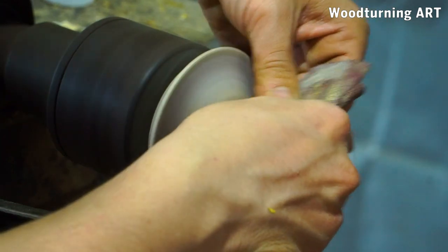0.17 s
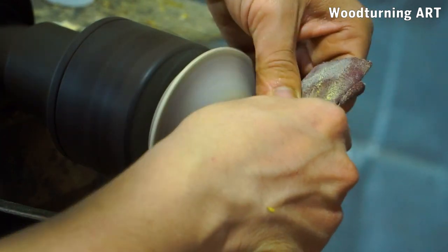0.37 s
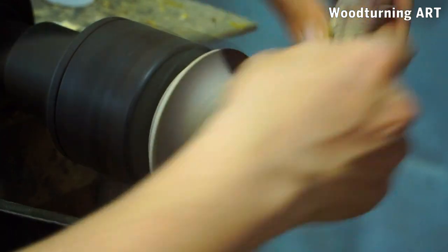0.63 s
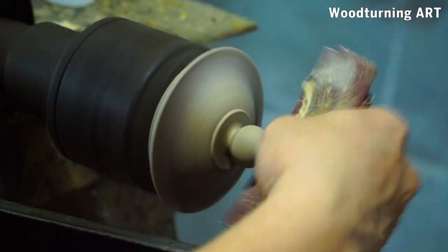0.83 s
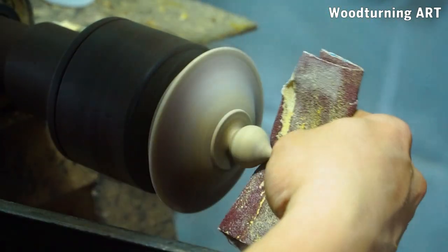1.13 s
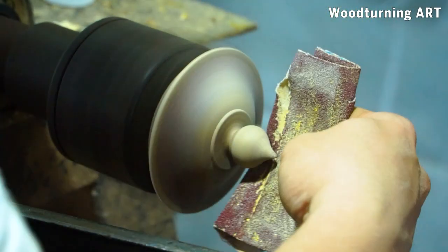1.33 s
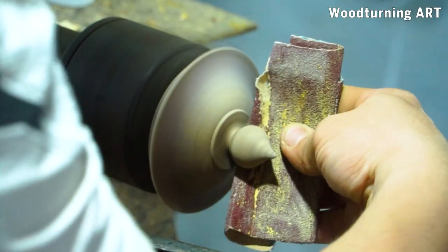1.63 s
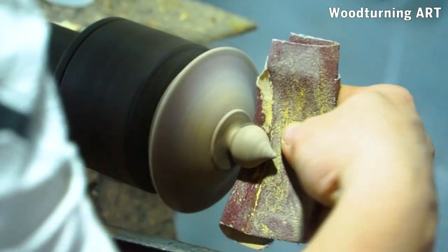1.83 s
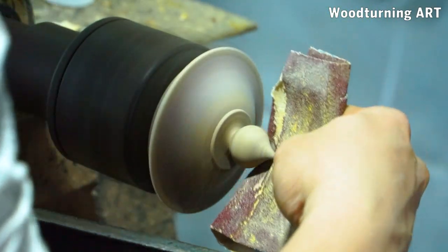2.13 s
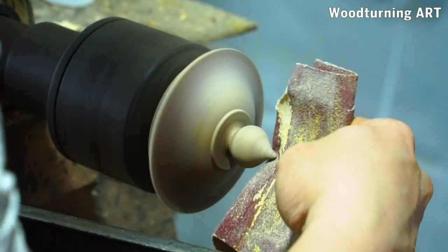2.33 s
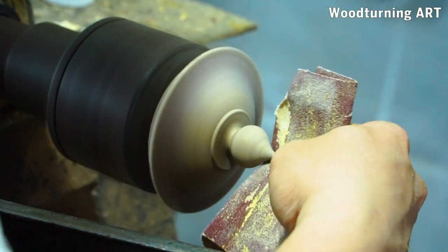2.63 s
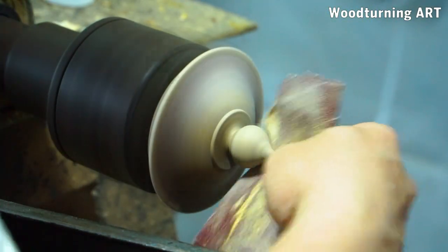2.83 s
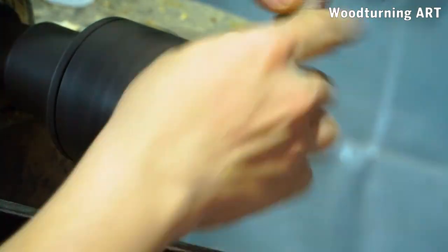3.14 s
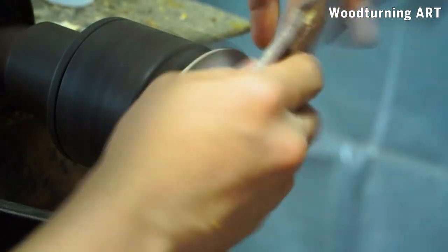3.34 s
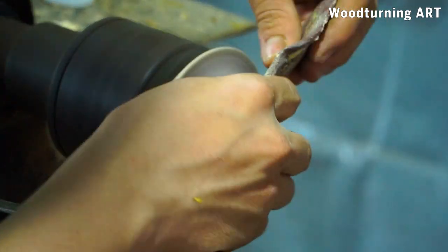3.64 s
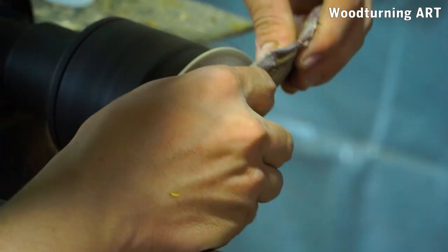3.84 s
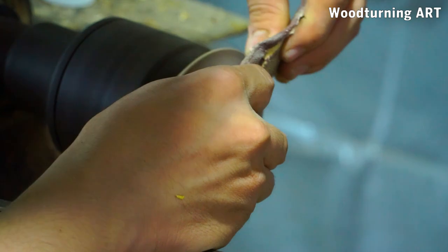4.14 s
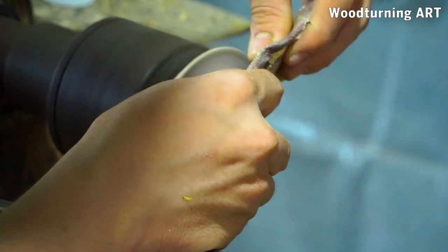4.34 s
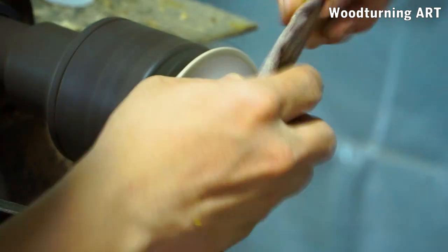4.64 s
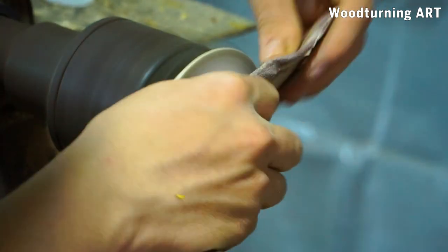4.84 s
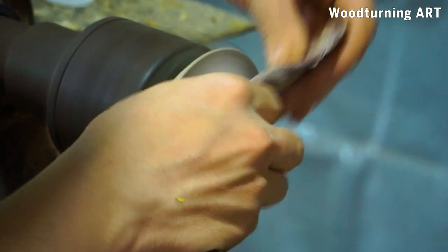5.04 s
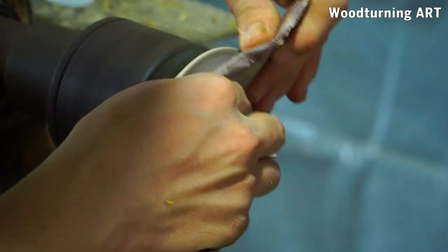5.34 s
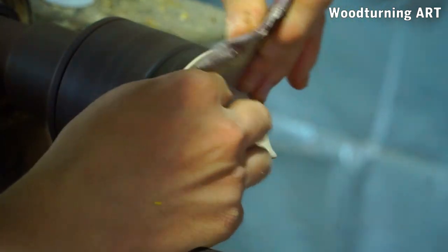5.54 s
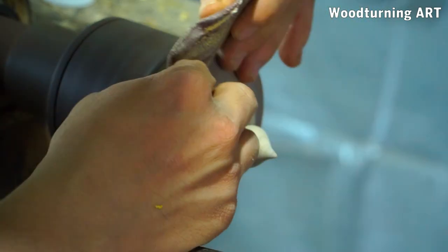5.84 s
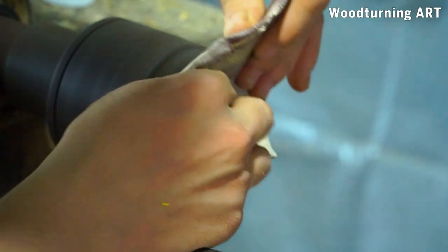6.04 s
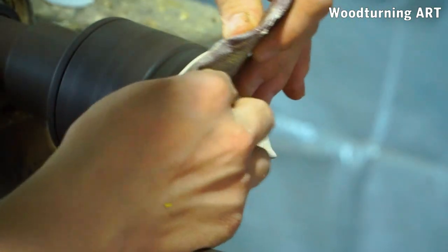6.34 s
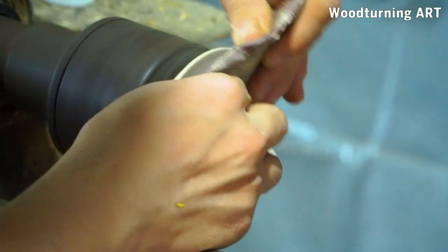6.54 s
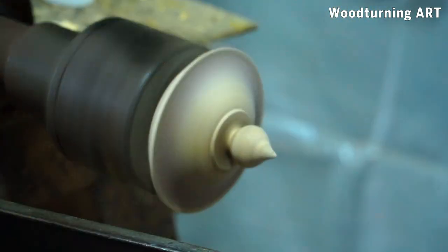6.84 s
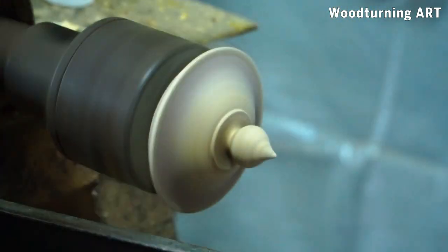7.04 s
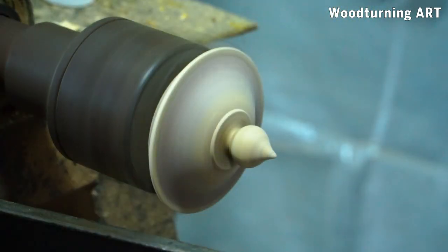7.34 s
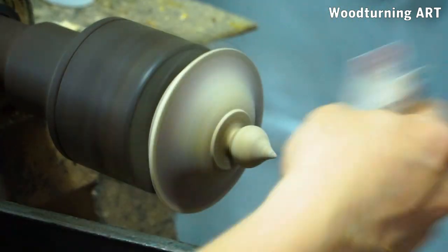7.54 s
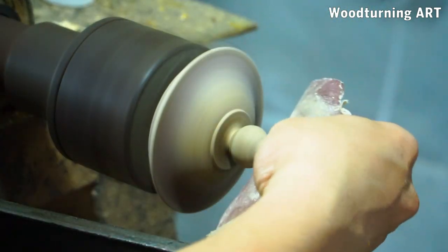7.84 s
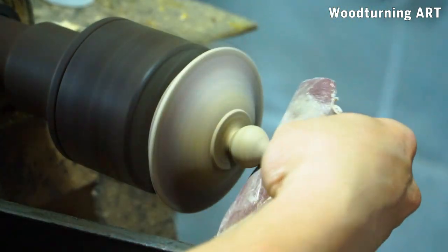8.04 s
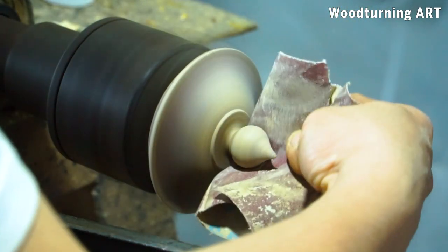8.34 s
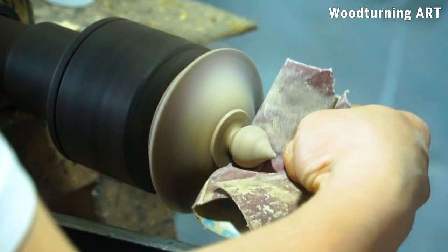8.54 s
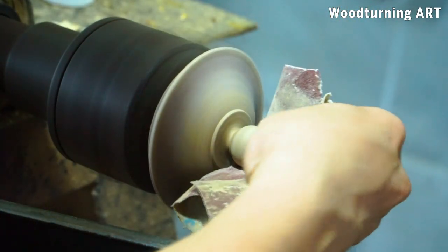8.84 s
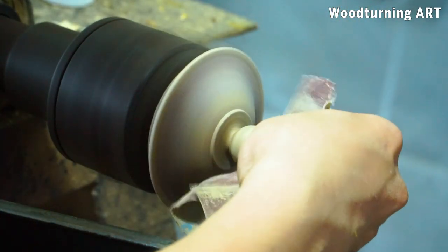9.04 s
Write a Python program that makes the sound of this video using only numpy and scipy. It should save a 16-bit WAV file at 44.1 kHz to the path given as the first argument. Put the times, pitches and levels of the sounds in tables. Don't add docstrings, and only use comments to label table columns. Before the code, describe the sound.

A wood lathe hums and whines steadily while hand-held sandpaper hisses, rasps and fizzes in uneven strokes against the spinning wood, close up.

```python
import sys
import numpy as np
from scipy import signal
from scipy.fft import rfft, irfft, next_fast_len
from scipy.io import wavfile
from scipy.ndimage import uniform_filter1d

SR = 44100
rng = np.random.default_rng(int(sys.argv[2]) if len(sys.argv) > 2 else 0)


def amplitude_ratio(level_db):
    exponent = np.asarray(level_db, float) / 20
    return 10 ** exponent


def wrap_up_sound(samples):
    columns = np.atleast_2d(samples).T
    tamed = np.clip(columns, -1, 1)
    steps = np.round(tamed * 32767).astype(np.int16)
    wavfile.write(sys.argv[1], SR, steps)


N = 404838


def evened(x):
    return x / np.sqrt(np.mean(x ** 2) + 1e-20)


def read(points, hz):
    f, value = np.transpose(points)
    return np.interp(np.log(hz + 1), np.log(f + 1), value)


def curve(points):
    s, db = np.transpose(points)
    return np.interp(np.arange(N) / SR, s, db)


def drift(hz):
    steps = rng.standard_normal(4000)
    return evened(np.interp(np.arange(N) / SR * 2 * hz, np.arange(4000), steps))


def peaks(modes, hz):
    return np.sqrt(sum((amplitude_ratio(db) / (1 + (2 * (hz - f) / width) ** 2)) ** 2 for f, width, db in modes))


def coloured(x, gain):
    size = next_fast_len(N, True)
    spectrum = rfft(x, size) * gain(np.fft.rfftfreq(size, 1 / SR))
    return evened(irfft(spectrum, size)[:, :N])


def noise(gain, patchy_db):
    frames = N // 256 + 5
    patches = uniform_filter1d(rng.standard_normal((257, frames)), size=8, axis=0)
    patches = evened(uniform_filter1d(patches, size=10, axis=1))
    z = np.exp(2j * np.pi * rng.random((2, 257, frames))) * rng.rayleigh(size=(2, 257, frames))
    hiss = signal.istft(z * amplitude_ratio(patchy_db * patches), window="cosine", nperseg=512, noverlap=256)[1]
    return coloured(hiss, gain)


def snags(per_s, spread_db, t60, share):
    draws = rng.random((2, N))
    sizes = (draws[0] < per_s / SR) * amplitude_ratio(-spread_db * np.log(draws[1] + 0.00042))
    tail = signal.lfilter([1], [1, -amplitude_ratio(-60 / (t60 * SR))], sizes)
    return evened(1 + share * evened(tail))


def strokes(rows, rest_db):
    rise_s, fall_s = 0.082, 0.063
    power = amplitude_ratio(rest_db) ** 2
    for start, length, db in rows:
        at = slice(max(round(start * SR), 0), round((start + length) * SR))
        t = np.arange(N)[at] / SR - start
        shape = np.clip(np.minimum(t / rise_s, (length - t) / fall_s), 0, 1)
        power[at] += (amplitude_ratio(db) * shape) ** 2
    return 10 * np.log10(power)


# (time [s], level [dB])
BED_RING = [
    (0, -50),
    (.05, -33),
    (.15, -29),
    (.22, -36),
    (.5, -39),
    (.65, -70),
]


def bed_ring():
    shake = rng.standard_normal((2, N))
    return amplitude_ratio(curve(BED_RING)) * coloured(shake, lambda hz: peaks([(720, 28, 0)], hz))


# (time [s], level [dB])
DRONE_REST = [(0.0, -50), (1.2, -48), (3.6, -56.5), (6.5, -70), (8.3, -59), (9.18, -61)]
# (start [s], length [s], level [dB])
DRONE_BOUTS = [(-.1, 0.27, -51), (.24, 0.19, -47), (.6, 0.37, -44), (.9, 0.37, -42), (1.2, .42, -44.5),
               (2.02, .26, -47), (2.5, 0.17, -50), (2.8, 0.21, -45), (3.17, 0.37, -49), (3.56, 0.22, -48),
               (4.15, 0.2, -48), (4.42, .16, -55), (4.85, 0.41, -53), (7.5, .5, -60), (8.4, .35, -54),
               (8.88, 0.13, -50)]


def drone_level():
    return strokes(DRONE_BOUTS, curve(DRONE_REST))


# (frequency [Hz], width [Hz], level [dB])
DRONE_BANDS = [(60, 130, -12), (164, 24, -12), (207.8, 8.2, -0.5), (248.8, 12.5, 1), (292.7, 5.4, 6),
               (337, 18, 2)]


def drone_noise(level_db):
    shake = rng.standard_normal((2, N))
    return amplitude_ratio(level_db - 4.0) * coloured(shake, lambda hz: peaks(DRONE_BANDS, hz))


def drone_tones(level_db):
    drone_hz, flutter_db, flutter_hz = 41.8, 2, 5.1
    turns = np.cumsum(drone_hz * (1 + 0.00802 * drift(3.5))) / SR
    out = np.zeros(N)
    for k, db in ((5, -3.5), (6, -1.8), (7, -4), (8, -5)):  # multiple, dB
        level = amplitude_ratio(level_db + db + flutter_db * drift(flutter_hz))
        out += level * np.cos(2 * np.pi * (k * turns + rng.random()))
    return out


# (frequency [Hz], level [dB per Hz])
ROAR = [(30, -58), (110, -39), (200, -31), (350, -18.5), (750, -9), (1000, -5.5), (1300, -1), (1700, -3),
        (3000, -6), (4100, -5), (4600, -12), (8200, -21.5), (9200, -37.5), (15700, -18.5)]


def roar():
    return noise(lambda hz: amplitude_ratio(read(ROAR, hz)), patchy_db=0.84) * snags(60., 1.6, 0.043, 0.13)


def tones(rows, starts):
    belt_hz, throb, waver = 6.8, .12, .08
    t = np.arange(N) / SR
    t = t + np.cumsum(0.00031 * drift(1.481)) / SR
    throbs = [1 + throb * np.cos(2 * np.pi * (belt_hz * t + rng.random())) + waver * drift(10.5)
              for _ in range(4)]
    out = np.zeros(N)
    for k, (hz, db) in enumerate(rows):
        out += amplitude_ratio(db + 3) * throbs[k % 4] * np.cos(2 * np.pi * (hz * t + starts[k]))
    return out


HUM = {4: -62.5, 12: -40.5, 16: -38, 17: -51.5, 20: -44, 28: -39}
# (frequency [Hz], level [dB])
STRAYS = [(768.6, -49), (1171.4, -39), (1338.9, -36), (1509.6, -43), (1649.2, -38.5), (1924.4, -51),
          (2052.3, -63), (2253.8, -37), (2685, -37.5)]
WHINE = {-4: -33, -2: -41, -1: -37, 0: -22.5, 1: -38, 3: -37.5, 4: -24.5, 5: -44, 8: -39.5, 9: -42, 12:
         -36.5, 20: -40}
TEETH = {2: -49.5, 5: -76, 9: -45, 10: -46, 11: -45, 12: -48, 13: -32.5}
# (time [s], level [dB])
LOAD = [(0.0, -35.5), (0.6, -41), (1.05, -40), (2.9, -38.5), (3.35, -40), (3.8, -37.5), (4.5, -36.5),
        (5.3, -38.5), (6.1, -38), (6.8, -39), (8.16, -39.5), (9.18, -39.5)]


def motor_tones():
    shaft_hz, slot_hz, tooth_hz = 37.6, 1269.4, 201.5
    hum = [(k * shaft_hz, db) for k, db in HUM.items()] + STRAYS
    whine = [(slot_hz + k * shaft_hz, db) for k, db in WHINE.items()]
    teeth = [(k * tooth_hz, db) for k, db in TEETH.items()]
    whine_starts = [-k ** 2 / 128 + k % 2 / 4 for k in WHINE]
    load_db = curve(LOAD)
    out = tones(hum, rng.random(len(hum))) + tones(whine, whine_starts)
    return out + amplitude_ratio(load_db - load_db.mean()) * tones(teeth, rng.random(len(teeth)))


# (time [s], level [dB])
MOTOR = [(0.0, -22.5), (0.5, -22), (1.05, -20), (1.45, -20), (1.9, -23), (2.2, -21), (2.5, -23),
         (2.75, -22.5), (3.3, -20.5), (3.5, -22.5), (3.95, -20), (4.25, -22.5), (5.25, -21), (6.55, -22.5),
         (6.95, -23.5), (7.6, -21.7), (8.85, -21.7), (9.18, -22.5)]


def lathe(duck_db):
    level_db = curve(MOTOR) + duck_db + 0.35 * drift(4.5)
    ride = amplitude_ratio(level_db - level_db.mean())
    drone_db = drone_level() + duck_db
    noisy = ride * amplitude_ratio(-18.0) * roar() + drone_noise(drone_db) + bed_ring()
    steady = ride * amplitude_ratio(-0.43) * motor_tones() + drone_tones(drone_db - 2.5)
    return noisy, steady


def ducking(rasp_db):
    lag_s, over_db, share, recover_db_per_s = 0.022, -25.5, 1.83, 12
    keep = np.exp(-1 / (lag_s * SR))
    heard_db = signal.lfilter([1 - keep], [1, -keep], rasp_db - rasp_db[0]) + rasp_db[0]
    recovery = np.arange(N) * recover_db_per_s / SR
    return recovery - np.maximum.accumulate(share * np.maximum(heard_db - over_db, 0) + recovery)


# (time [s], peak level [dB], colour [Hz])
SCUFFS = [(0.2763, -11.5, 8260), (0.5624, -16, 5870), (0.839, -13, 6660), (1.1523, -13, 8300),
          (1.3818, -15, 7770), (1.4451, -13, 6080), (1.9135, -23, 8100), (1.954, -17, 6080),
          (2.085, -14, 8050), (2.3441, -15, 7110), (2.5551, -12, 8100), (2.7217, -15, 8100),
          (2.8, -14, 5330), (2.863, -14.5, 6180), (2.9332, -18, 7330), (3.2126, -16, 8050),
          (3.36, -14, 7470), (4.5486, -8, 7800), (4.6493, -15, 5520), (4.8394, -17, 5930),
          (5.14, -22, 8200), (5.6984, -13, 8490), (6.2412, -16, 8450), (7.3422, -15, 6870),
          (7.4704, -14.5, 7700), (8.0616, -19, 5480), (8.224, -12, 8110), (8.3155, -14, 7500),
          (8.4337, -12, 7570), (8.9, -11.5, 7700),
          (0.3516, -14, 13900), (0.7861, -19, 11700), (2.2947, -19, 13100), (2.3805, -21, 12100),
          (2.9851, -17, 13500), (3.245, -20, 12800), (3.7529, -14, 11900), (3.914, -18, 11200),
          (3.9629, -13, 13700), (4.1849, -11, 12800), (4.4383, -15, 15400), (4.6239, -25, 13500),
          (4.6488, -17, 15500), (4.8384, -21, 11600), (4.8958, -19, 14900), (5.0833, -14, 14000),
          (5.7598, -11, 15200), (5.7992, -12, 13500), (6.6298, -11, 13700), (7.1975, -21, 11200),
          (7.3427, -18, 11900), (7.4175, -14, 15100), (7.5353, -19, 13600), (7.9818, -17, 14000),
          (8.3789, -19, 12300), (8.521, -20, 13000), (8.9356, -14, 11100), (9.0992, -19, 10800)]


def scuffs():
    t60_s, size = .05, 4096
    out = np.zeros((2, N + size))
    t, hz = np.arange(size) / SR, np.fft.rfftfreq(size, 1 / SR)
    for s, db, colour_hz in SCUFFS:
        body = [(colour_hz, 0.13 * colour_hz, 0), (colour_hz * 0.74, 9000, -12)]
        gain = peaks(body, hz) * np.minimum(hz / 3500, 1) ** 2
        puff = evened(irfft(rfft(rng.standard_normal((2, size))) * gain))
        fade = amplitude_ratio(db + 0.5 - 60 * t / t60_s) * np.minimum(t / 0.0015, 1)
        at = round(s * SR)
        out[:, at:at + size] += fade * puff
    return out[:, :N]


# (time [s], level [dB])
PRESSURE = [(0.0, -27.5), (0.75, -30.5), (1.0, -28), (1.42, -27.5), (1.77, -30), (2.08, -26.5), (2.6, -34),
            (2.85, -29), (3.5, -31.5), (3.97, -27.5), (4.55, -25.5), (4.75, -30), (5.45, -28),
            (5.95, -27.5), (6.62, -30), (7.05, -34), (8.4, -29), (9.18, -31.5)]
# (start [s], length [s], level [dB])
RINGS = [(-0.1, 0.22, -26), (0.12, 0.35, -33), (0.9, 0.26, -30.5), (1.2, 0.47, -29.5), (1.52, 0.57, -32),
         (1.84, 0.35, -34), (2.08, 0.18, -34), (2.78, 0.17, -27), (3.0, .3, -42), (3.75, 0.82, -37),
         (5.3, .5, -37), (6.55, .16, -30), (8.0, 0.31, -33), (8.24, .2, -35), (8.38, 0.19, -27),
         (8.55, .42, -31.5)]
# (start [s], length [s], fizz level [dB], rasp above fizz [dB])
STROKES = [(-0.1, 0.16, -31, 2), (0.74, .16, -32, -10), (0.96, 0.18, -30.5, -1), (1.17, 0.38, -30, 0),
           (1.48, 0.32, -30.5, 0), (1.72, .52, -34.5, -1), (2.76, 0.19, -33, 1), (3.18, .15, -34, 0),
           (3.843, .22, -34, -1), (3.98, 0.34, -30.5, -17), (4.276, 0.26, -32, -8), (4.58, 0.12, -35, 3),
           (5.2, .3, -31, -5), (5.4, .22, -25, -2.5), (5.547, 0.27, -29.5, 0), (5.703, .26, -27, 3.5),
           (5.897, 0.3, -29, -3), (6.16, 0.52, -29.5, -2), (6.584, 0.19, -25, 0.5), (7.3, .5, -40.5, 4),
           (8.22, 0.17, -25.5, -3), (8.33, 0.29, -28.5, -0.5), (8.55, .4, -36, 2), (8.88, 0.15, -30, -4)]


def hand():
    tremble_db, tremble_hz = 0.4, 6.5
    press_db = curve(PRESSURE)
    rest_db = 0.38 * (press_db - press_db.mean())
    fizz_rows = [(s, length, db) for s, length, db, _ in STROKES]
    rasp_rows = [(s, length, db + up_db) for s, length, db, up_db in STROKES]
    ring_db = strokes(RINGS, -38 + rest_db)
    fizz_db = strokes(fizz_rows, -37 + rest_db)
    rasp_db = strokes(rasp_rows, -36 + rest_db)
    return [db + tremble_db * drift(tremble_hz) for db in (press_db, ring_db, fizz_db, rasp_db)]


# (frequency [Hz], level [dB])
SCRUB = [(1200, -26.5), (2200, -9.5), (3800, -4.5), (5500, -1), (8500, -4), (10000, -10), (15000, -13.5)]


def scrub(level_db, catch):
    return amplitude_ratio(level_db + 8.0) * noise(lambda hz: amplitude_ratio(read(SCRUB, hz)), patchy_db=1.2) * catch


# (frequency [Hz], width [Hz], level [dB])
FOLD = [
    (8100, 430, -2.5),
    (6120, 500, -11),
    (4220, 580, -12.5),
]


def fold_ring(ring_db, scrub_db):
    loose_db = 1.5 * np.minimum(ring_db - scrub_db + 4.0, 0)
    ring = noise(lambda hz: peaks(FOLD, hz), patchy_db=3.0)
    return amplitude_ratio(ring_db + loose_db + 3.5) * ring * snags(120., 2.5, 0.017, 0.49)


# (frequency [Hz], level [dB])
FIZZ = [(4000, -34), (8000, -1.5), (9500, -0.5), (11000, 1.5), (12500, -1), (15400, -6)]


def fizz(level_db, edge):
    return amplitude_ratio(level_db + 6.5) * noise(lambda hz: amplitude_ratio(read(FIZZ, hz)), patchy_db=0.8) * edge


# (frequency [Hz], level [dB])
RASP = [(8000, -29), (11000, -10), (13500, 2.5), (15400, 0)]


def rasp(level_db, edge):
    return amplitude_ratio(level_db + 7.0) * noise(lambda hz: amplitude_ratio(read(RASP, hz)), patchy_db=2.8) * edge


def sandpaper(scrub_db, ring_db, fizz_db, rasp_db):
    catch = snags(70., 1.6, 0.04, 0.13)
    edge = catch * snags(40., 3.7, 0.045, 0.08)
    rubbing = scrub(scrub_db, catch) + fold_ring(ring_db, scrub_db)
    return rubbing + fizz(fizz_db, edge) + rasp(rasp_db, edge)


# (frequency [Hz], likeness [0 to 1])
SAME = [(40, .2), (120, 1), (300, 1), (1400, 0.97), (2200, 1), (3500, 0.57), (5000, 0.78), (9000, 0.78),
        (15000, .48)]
# (frequency [Hz], phase [radians])
LEAD = [(60, -0.32), (150, -0.64), (250, -0.74), (450, -1.46), (750, -1.58), (1300, -1.844), (4300, -1.62),
        (12200, -1.4), (13600, -1.7), (16000, -1.2)]
# (frequency [Hz], level [dB])
TILT = [(60, 3), (110, 0), (200, 0.5), (380, 0.5), (700, 2), (1290, 2.0), (2380, 4), (4400, 6.5),
        (8120, 13), (15000, 14)]
# (frequency [Hz], level [dB])
LOW_CUT = [(30, -11), (110, -10), (160, 0)]


def two_ports(noisy, steady):
    size = next_fast_len(N, True)
    hz = np.fft.rfftfreq(size, 1 / SR)
    near, other = rfft(noisy, size)
    steady = rfft(steady, size)
    same = np.clip(read(SAME, hz), 0, 1)
    right = same * near + np.sqrt(1 - same ** 2) * other + steady
    right *= amplitude_ratio(-read(TILT, hz)) * np.exp(-1j * read(LEAD, hz))
    low_cut = amplitude_ratio(read(LOW_CUT, hz))
    return irfft(np.array([near + steady, right]) * low_cut, size)[:, :N]


def scene():
    scrub_db, ring_db, fizz_db, rasp_db = hand()
    duck_db = ducking(rasp_db)
    noisy, steady = lathe(duck_db)
    paper = sandpaper(scrub_db + duck_db, ring_db, fizz_db, rasp_db) + scuffs()
    return two_ports(noisy + paper, steady)


def band_limit(x):
    return signal.sosfilt(signal.butter(12, 16250, fs=SR, output="sos"), x)


def record(dry):
    edge = signal.firwin(1535, 15740, window=("kaiser", 8), fs=SR)
    mix = signal.oaconvolve(np.clip(dry, -1, 1), edge[None], "same")
    return band_limit(mix)


dry = scene()
out = record(dry)
wrap_up_sound(out)
```